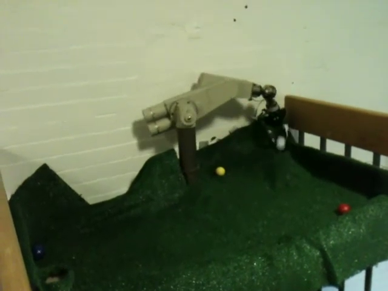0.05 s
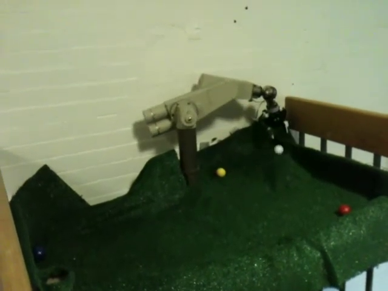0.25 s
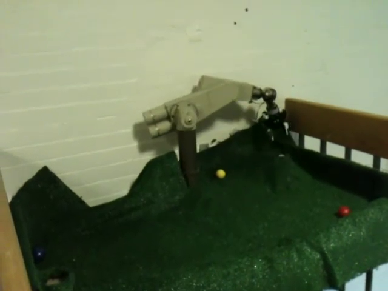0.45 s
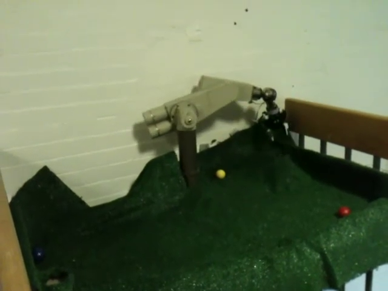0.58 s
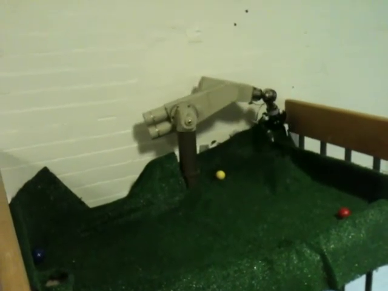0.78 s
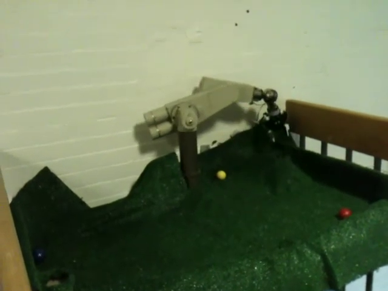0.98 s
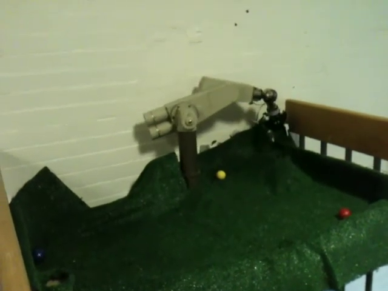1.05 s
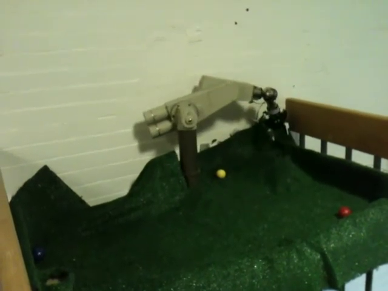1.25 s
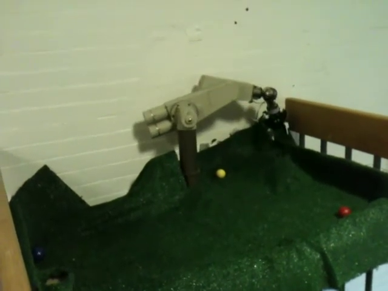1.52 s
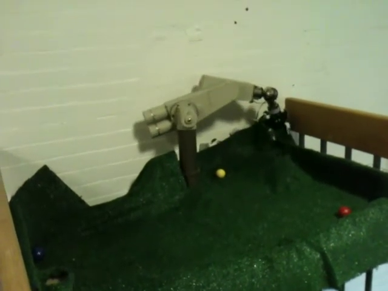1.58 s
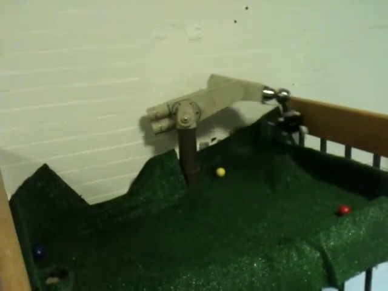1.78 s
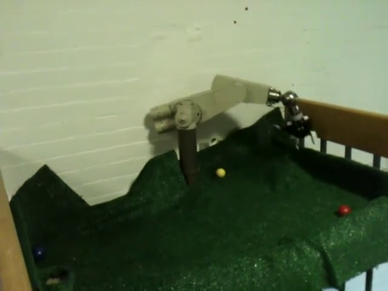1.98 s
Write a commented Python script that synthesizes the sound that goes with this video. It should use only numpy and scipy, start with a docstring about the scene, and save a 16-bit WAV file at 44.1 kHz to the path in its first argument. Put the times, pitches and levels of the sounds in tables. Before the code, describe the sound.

A small hard ball bounces on a cloth-covered board, its clicking thuds coming faster and softer until it settles. A robot hand whirrs faintly before the drop, and the arm's joints tick quietly afterwards in a small room.

```python
"""A small hard ball bounces to rest on a cloth-covered board, dropped by a robot hand in a small room.
Each landing gives a short thud of the board and a click; board and room ring on.
The arm's motors hum faintly, whirr and whine as the hand opens. Its joints squeak briefly,
then tick and rattle as it moves away."""
import sys
import numpy as np
from scipy import signal
from scipy.fft import rfft, irfft
from scipy.io import wavfile
from scipy.ndimage import uniform_filter1d

SR = 44100
rng = np.random.default_rng(int(sys.argv[2]) if len(sys.argv) > 2 else 0)


def master(y):
    """Save y as 16-bit WAV."""
    cut = np.clip(np.atleast_2d(y).T, -1, 1)
    pcm = np.round(cut * 32767)  # scale
    wavfile.write(sys.argv[1], SR, pcm.astype(np.int16))


N = 90404
T = np.arange(N) / SR
HZ = np.maximum(np.fft.rfftfreq(N, 1 / SR), 1)

# motor hum and room air: freq_hz, density_db
HUM_SPECTRUM = [(30, 4), (90, -8), (190, 2), (340, -5.5), (800, -16), (2500, -21), (4000, -29.5),
                (8000, -38)]
# hum envelope: time_s, level_db
HUM_ENVELOPE = [(0, -52), (.5, -56), (1.4, -53.5), (1.7, -51.5), (2.05, -51)]
# gear whirr: freq_hz, density_db
WHIRR_SPECTRUM = [(600, -31), (1500, -6), (3500, 3), (4800, -2.5), (7000, -2.5), (12500, -19), (15500, -19)]
# whirr envelope: time_s, level_db
WHIRR_ENVELOPE = [(0, -72), (.07, -62.5), (.09, -57), (.23, -49.5), (.3, -64.5), (1.62, -101), (1.78, -76),
                  (1.85, -66.5), (2.05, -72)]
# finger motor run-up: time_s, pitch_hz, level_db
FINGER_WHINE = [(.05, 2400, -72), (.10, 2750, -58), (.135, 3076, -96), (.155, 3290, -55), (.19, 3550, -57),
                (.228, 3690, -45.5), (.27, 3920, -130)]
# joint squeaks: centre_s, sigma_s, pitch_hz, level_db
JOINT_SQUEAKS = [(.033, 0.0053, 4050, -56), (0.189, 0.0027, 2370, -41.5), (1.643, 0.0016, 4070, -45)]

# ball landings: time_s, strength_db, click_db, spot (-1 to 1)
LANDINGS = [(0.235, 0, 2, -0.65), (.4868, -1.67, -1, -0.7), (0.6526, -3.5, -7.5, -0.81),
            (.7898, -6.5, -11, 1), (0.903, -8.5, -18, 0.75), (0.989, -9.5, -20, -0.082),
            (1.056, -11.5, -25.5, -0.26), (1.1088, -12, -28.5, 0.23), (1.1469, -14, -33.5, 0.54),
            (1.1772, -18.5, -39, 0), (1.2035, -19, -38, 0)]
# thud echoes off edges and walls: delay_s, level_db
THUD_ECHOES = [(.00348, -8), (.00544, -13.5), (.00716, -20), (.00896, -16.5), (.0175, -16.5),
               (0.0197, -14.5)]
# board modes: pitch_hz, level_db, t60_s
BOARD_MODES = [(121.6, -46.5, 0.73), (177.1, -35.5, 0.42), (280.4, -35, 0.43), (313.7, -31.5, 0.24),
               (510.2, -32, 0.28), (553, -26.5, 0.23), (618, -32, 0.14), (850, -35, .34),
               (880, -34.5, 0.31), (978, -30, 0.21), (1085, -33.5, 0.33), (1130, -28.5, 0.35),
               (1143, -35, 0.35), (1252, -28.5, 0.34), (1501, -26.5, 0.13), (1544, -25.5, .3),
               (1604, -21.5, 0.22)]
# dense ringing of board and room: freq_hz, density_db
TAIL_SPECTRUM = [(110, -5), (230, -4), (320, 0), (430, -8), (540, -3.5), (730, -4.5), (1250, 0),
                 (2000, 1.5), (3000, 0), (6000, -25)]
# its decay: freq_hz, t60_s
TAIL_DECAY = [(120, 0.41), (260, 0.99), (700, 0.6), (1800, 0.64)]
# ball click: freq_hz, density_db
CLICK_SPECTRUM = [(1500, -1), (5200, 6.5), (9400, -3.5), (11000, -14), (15000, -26)]
# rings in the click: pitch_hz, level_db, db_per_spot
CLICK_RINGS = [(2620, -32, 4), (2830, -45, -27.5), (3515, -28, 10.5), (4320, -30, -1), (4910, -31, 7.5),
               (5870, -32.5, 7), (7390, -40.5, 3)]
# room tail of the click: freq_hz, density_db
CLICK_ROOM_SPECTRUM = [(1800, -5), (2850, -3), (3800, -13), (4350, -6.5), (5200, -14.5), (7200, -14.5),
                       (9000, -23), (15000, -43)]

# joint ticks: start_s, level_db, t60_s, knock_rel_db, rattle_rel_db
JOINT_TICKS = [(1.6187, -52.5, 0.046, -5, -7.5), (1.641, -47, 0.027, -12, -11),
               (1.6503, -44.5, 0.037, -24, -11.5), (1.7398, -43, .025, -15, -13),
               (1.749, -45.5, 0.02, -9, -20), (1.7937, -50.5, 0.031, -2, -1.5),
               (1.8216, -45.5, 0.077, -13, 0), (1.848, -48.5, .08, -8.5, -3), (1.8975, -48, 0.084, -13, -9),
               (1.923, -51, 0.2, -1, -5), (2.0238, -49.5, 0.22, 3, -3)]
# bright tick: freq_hz, density_db
TICK_SPECTRUM = [(1000, -33), (2350, 3.5), (2900, -3.5), (4000, -5), (5300, -14.5), (10000, -20.5),
                 (15000, -63)]
# low knock: freq_hz, density_db
KNOCK_SPECTRUM = [(300, -24), (750, 5.5), (1400, -6), (1650, 11.5), (2100, -43)]
# thin rattle: freq_hz, density_db
RATTLE_SPECTRUM = [(3000, -18), (6250, 4), (7200, -12), (15000, -57)]

RING_BUILD_S = 0.00081
PITCH_WOBBLE_RMS = 0.0246


def amp(db):
    """Decibels to gain."""
    return 10 ** (np.asarray(db) / 20)


def at_hz(table, hz):
    """Table lookup on a log-frequency axis."""
    freqs_hz, values = np.transpose(table)
    return np.interp(np.log(hz), np.log(freqs_hz), values)


def in_time(table):
    """Table columns as curves over T."""
    times_s, *columns = np.transpose(table)
    return [np.interp(T, times_s, column) for column in columns]


def noise(spectrum):
    """Coloured noise, rms 1."""
    x = irfft(rfft(rng.standard_normal(N)) * amp(at_hz(spectrum, HZ)), N)
    return x / x.std()


def jitter():
    """Smoothed noise, rms 1."""
    x = uniform_filter1d(rng.standard_normal(N), size=60)
    return x / x.std()


def fade(start_s, t60_s):
    """Step to 1, then exponential decay."""
    return (T >= start_s) * np.exp(-np.log(1000) * np.maximum(T - start_s, 0) / t60_s)


def burst(centre_s, sigma_s):
    """Gaussian envelope, peak 1."""
    return np.exp(-.5 * ((T - centre_s) / sigma_s) ** 2)


def motor_hum():
    """Faint continuous noise of motors and room air."""
    return amp(in_time(HUM_ENVELOPE)[0]) * noise(HUM_SPECTRUM)


def gear_rasp(depth_db=3.2):
    """Fast level flutter of the gears, rms 1."""
    gain = amp(depth_db * jitter())
    return gain / np.sqrt(np.mean(gain ** 2))


def gear_drive(octave_db=-14):
    """Gears whirr as the arm moves; the finger motor whines up in pitch, then stops."""
    whirr = amp(in_time(WHIRR_ENVELOPE)[0]) * noise(WHIRR_SPECTRUM)
    pitch_hz, whine_db = in_time(FINGER_WHINE)
    phase = 2 * np.pi * np.cumsum(pitch_hz * (1 + PITCH_WOBBLE_RMS * jitter())) / SR
    whine = np.sqrt(2) * (np.sin(phase) + amp(octave_db) * np.sin(2 * phase))
    return gear_rasp() * (whirr + amp(whine_db) * whine)


def joint_squeaks():
    """Brief tones, rough in pitch and level."""
    clock_s = np.cumsum(1 + PITCH_WOBBLE_RMS * jitter()) / SR
    tones = sum(amp(db) * burst(centre_s, sigma_s) * np.sin(2 * np.pi * hz * clock_s)
                for centre_s, sigma_s, hz, db in JOINT_SQUEAKS)
    return gear_rasp() * tones


def thud(at_s, peak_hz=1766):
    """One push and pull of air, height 1; the board radiates best at peak_hz."""
    ratio_sq = (HZ / peak_hz) ** 2
    pulse = irfft(1j * ratio_sq * np.exp(-ratio_sq - 2j * np.pi * HZ * at_s), N)
    return pulse / pulse.max()


def dense_tail(start_s, late_db=-23, early_db=-15, early_t60_s=0.033):
    """Board and room ringing, decaying per octave band, plus early reflections."""
    spectrum = rfft(noise(TAIL_SPECTRUM))
    centres_hz = np.geomspace(110, 3520, 6)
    late = 0
    for hz, weights in zip(centres_hz, np.eye(len(centres_hz))):
        band = irfft(spectrum * np.interp(np.log(HZ), np.log(centres_hz), weights), N)
        late += band * fade(start_s, at_hz(TAIL_DECAY, hz))
    early = noise(TAIL_SPECTRUM) * fade(start_s, early_t60_s)
    return amp(late_db) * late + amp(early_db) * early


def board_response(at_s, thud_db=4):
    """Impulse response: thud, echoes, modes, tail."""
    thuds = thud(at_s) + sum(amp(db) * thud(at_s + delay_s) for delay_s, db in THUD_ECHOES)
    modes = sum(amp(db) * np.sin(2 * np.pi * (hz * (T - at_s) + rng.random())) * fade(at_s, t60_s)
                for hz, db, t60_s in BOARD_MODES)
    build = 1 - np.exp(-np.maximum(T - at_s, 0) / RING_BUILD_S)
    return amp(thud_db) * thuds + build * (modes + dense_tail(at_s))


def board_blows(first_contact_s=0.0006, stretch_exponent=0.29):
    """One half-sine push per landing; weaker ones press longer and sound duller."""
    lead_s = .01  # room for the thud's leading half
    force = np.zeros(N)
    for time_s, strength_db, _, _ in LANDINGS:
        contact_s = first_contact_s * amp(strength_db) ** -stretch_exponent
        push = np.cos(np.pi * np.clip((T - time_s + lead_s) / contact_s, -.5, .5))
        force += amp(strength_db) * push / push.sum()
    return signal.fftconvolve(force, board_response(lead_s))[:N]


def click_rings(start_s, click_db, spot, t60_s=.018, scatter_db=5, pitch_spread=.012):
    """Short pitched rings of one click; the spot struck sets their balance."""
    age_s = np.arange(SR // 10) / SR
    build = 1 - np.exp(-age_s / RING_BUILD_S)
    first = int(start_s * SR)
    rings = np.zeros(N)
    for hz, mode_db, db_per_spot in CLICK_RINGS:
        louder, higher = rng.standard_normal(2)
        level_db = click_db + mode_db + spot * db_per_spot + scatter_db * louder
        tone = np.sin(2 * np.pi * (hz * (1 + pitch_spread * higher) * age_s + rng.random()))
        rings[first:first + len(age_s)] += amp(level_db - 60 * age_s / t60_s) * build * tone
    return rings


def ball_clicks(lag_s=0.003, sigma_s=0.001245):
    """Bright click just after each thud: crack, echo, rings, room tail."""
    crack_db, echo_db, echo_lag_s = -31.5, -3.5, 0.0133
    room_db, room_t60_s = -37.5, 0.34
    crack, room, rings = 0, 0, 0
    for time_s, _, click_db, spot in LANDINGS:
        click_s = time_s + lag_s
        echo = amp(echo_db) * burst(time_s + echo_lag_s, sigma_s)
        crack += amp(click_db + crack_db) * (burst(click_s, sigma_s) + echo)
        room += amp(click_db + room_db) * fade(click_s, room_t60_s)
        rings += click_rings(click_s - sigma_s, click_db, spot)
    return crack * noise(CLICK_SPECTRUM) + rings + room * noise(CLICK_ROOM_SPECTRUM)


def joint_ticks(room_db=-13.5, room_t60_s=0.47):
    """Ticks with knock, rattle and room tail; the wrist's metal rings after each."""
    ring_hz, ring_db, ring_t60_s, pitch_spread = 2365, -7, 0.11, 0.024
    tick_power, knock_power, rattle_power, metal = 0, 0, 0, 0
    for start_s, db, t60_s, knock_db, rattle_db in JOINT_TICKS:
        power = fade(start_s, t60_s) ** 2 + (amp(room_db) * fade(start_s, room_t60_s)) ** 2
        tick_power += amp(db) ** 2 * power
        knock_power += amp(db + knock_db) ** 2 * power
        rattle_power += amp(db + rattle_db) ** 2 * power
        hz = ring_hz * (1 + pitch_spread * rng.standard_normal())
        metal += amp(db + ring_db) * np.sin(2 * np.pi * hz * (T - start_s)) * fade(start_s, ring_t60_s)
    ticks = np.sqrt(tick_power) * noise(TICK_SPECTRUM)
    knocks = np.sqrt(knock_power) * noise(KNOCK_SPECTRUM)
    rattles = np.sqrt(rattle_power) * noise(RATTLE_SPECTRUM)
    return ticks + knocks + rattles + metal


def scene():
    """Ball and arm, mono."""
    ball = board_blows() + ball_clicks()
    arm = motor_hum() + gear_drive() + joint_squeaks() + joint_ticks()
    return (ball + arm)[None]


def record(dry):
    """Microphone band limits: deep bass and extreme treble cut."""
    low_cut_hz, stopband_hz = 117, 16500
    highpass = signal.ellip(6, 1, 27, low_cut_hz, "high", fs=SR, output="sos")
    lowpass = signal.cheby2(16, 60, stopband_hz, fs=SR, output="sos")
    return signal.sosfilt(lowpass, signal.sosfilt(highpass, dry))


dry = scene()
out = record(dry)
master(out)
```